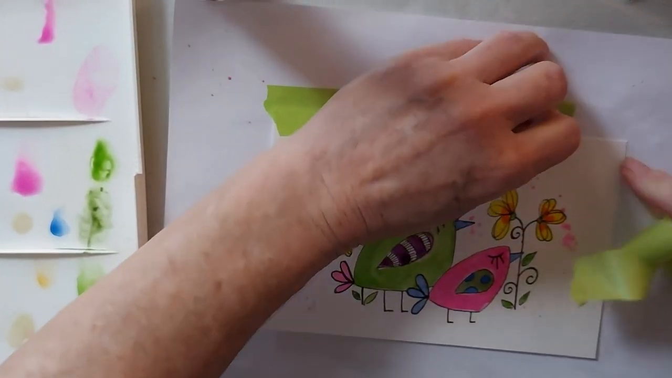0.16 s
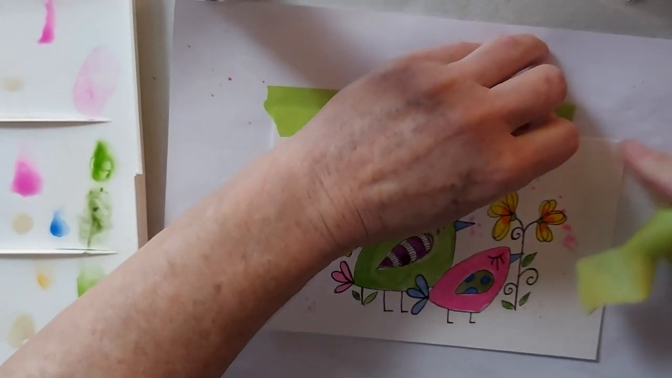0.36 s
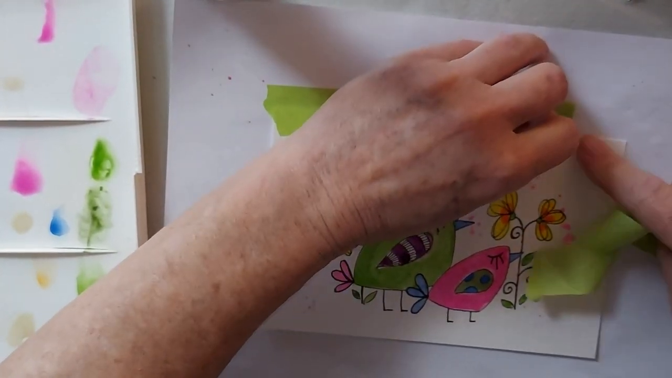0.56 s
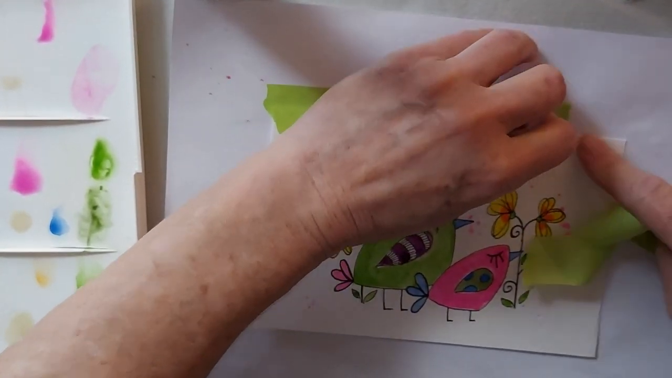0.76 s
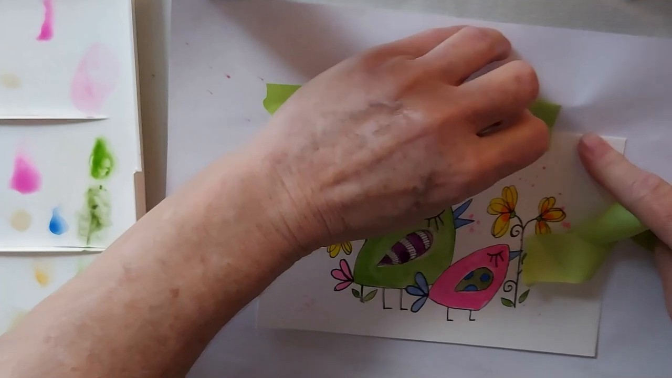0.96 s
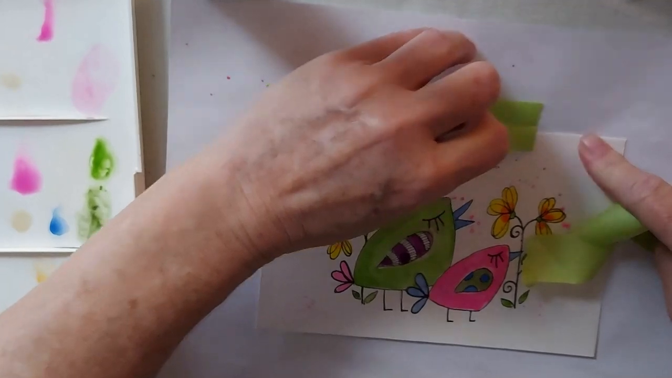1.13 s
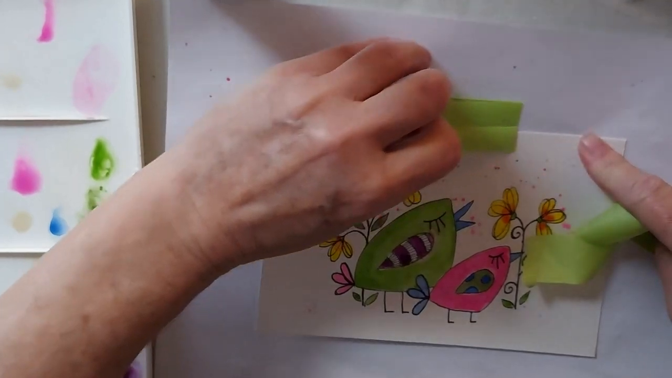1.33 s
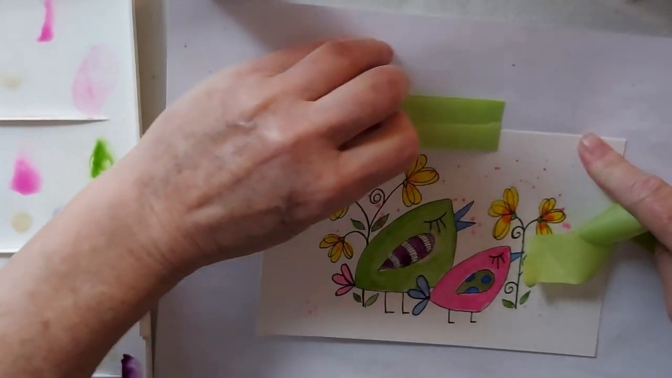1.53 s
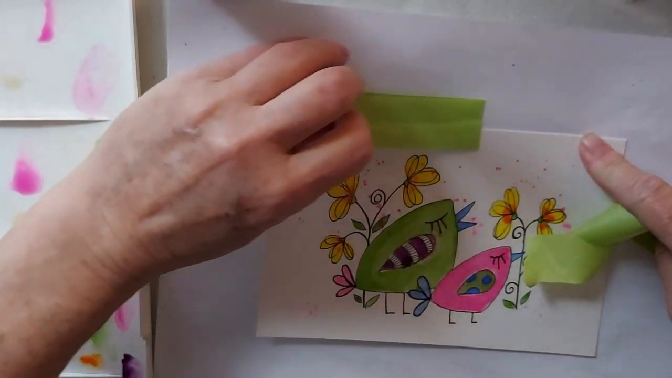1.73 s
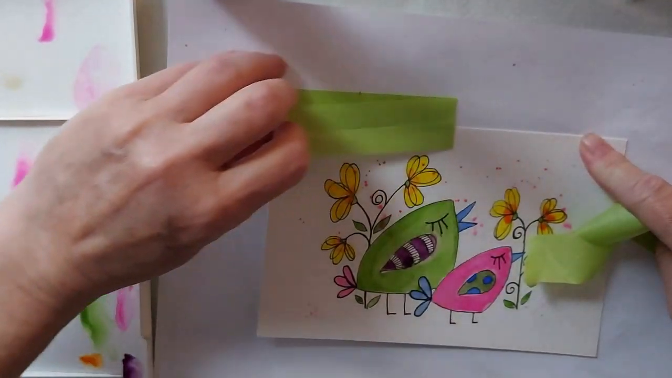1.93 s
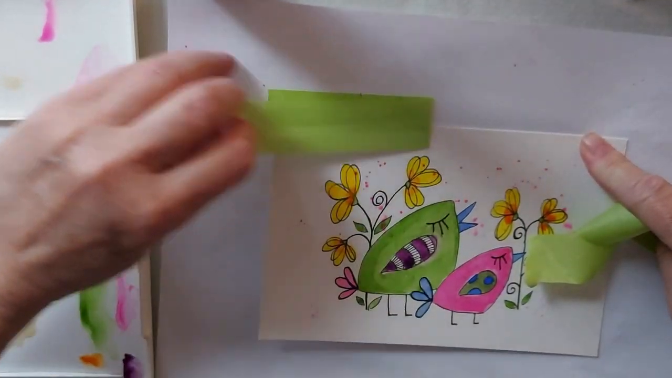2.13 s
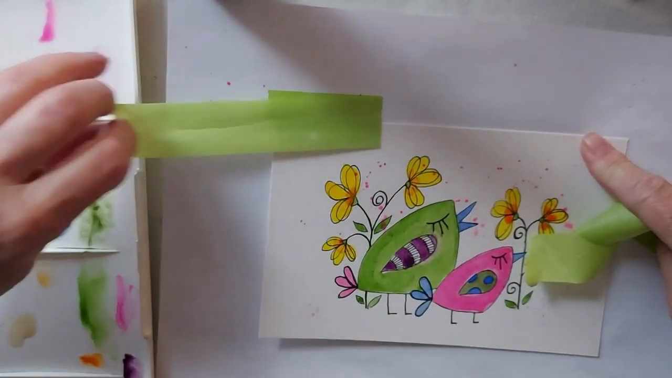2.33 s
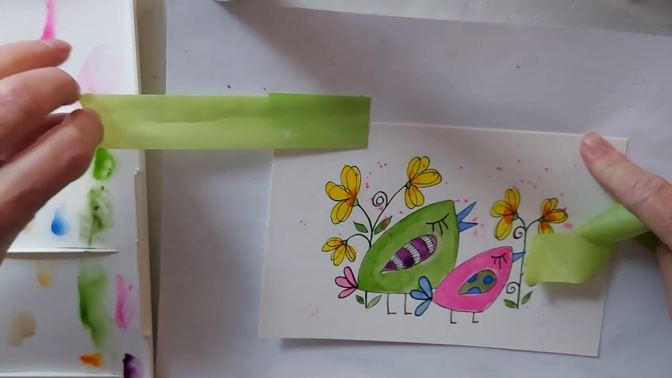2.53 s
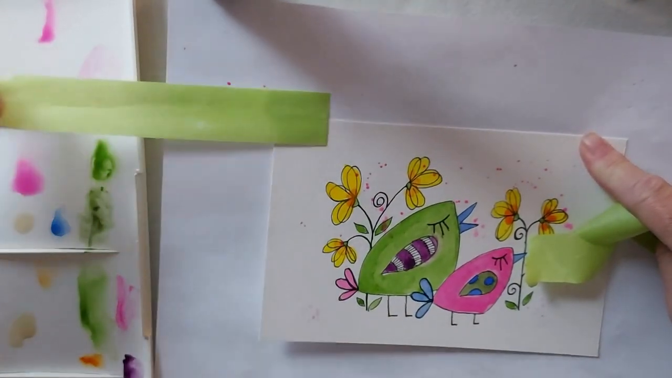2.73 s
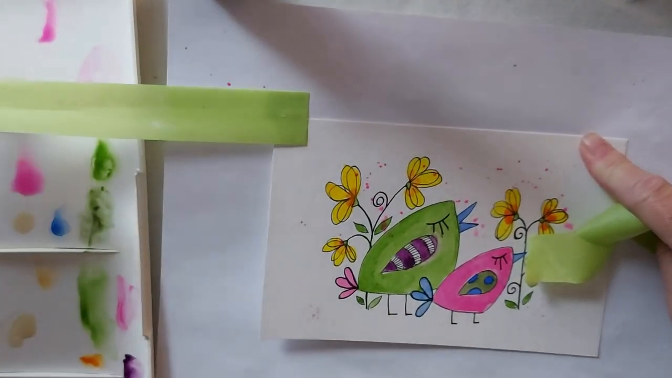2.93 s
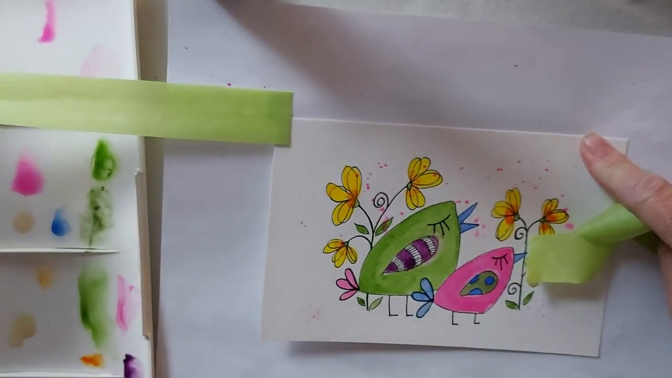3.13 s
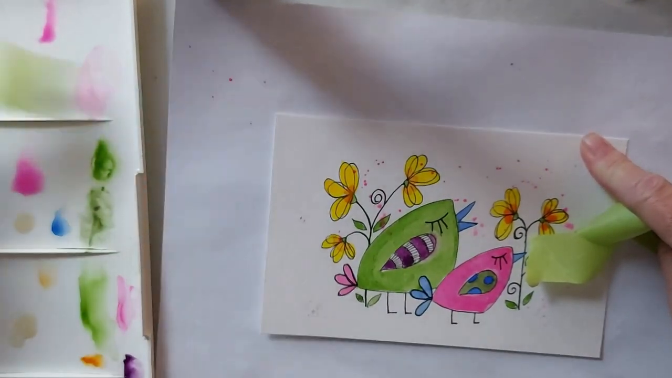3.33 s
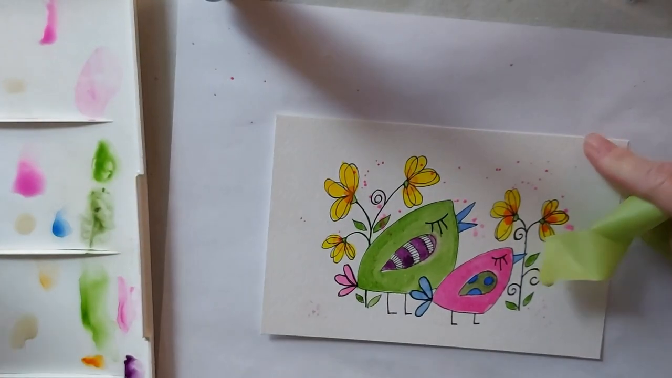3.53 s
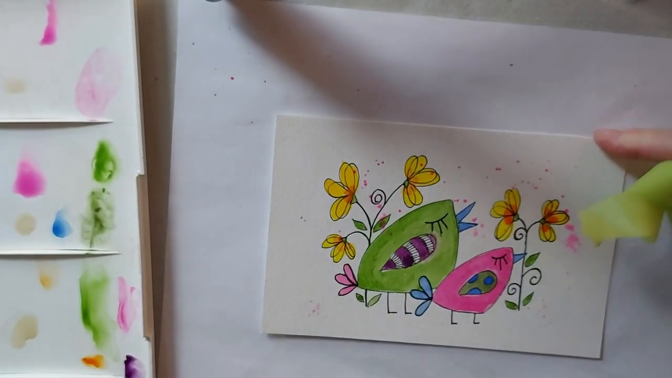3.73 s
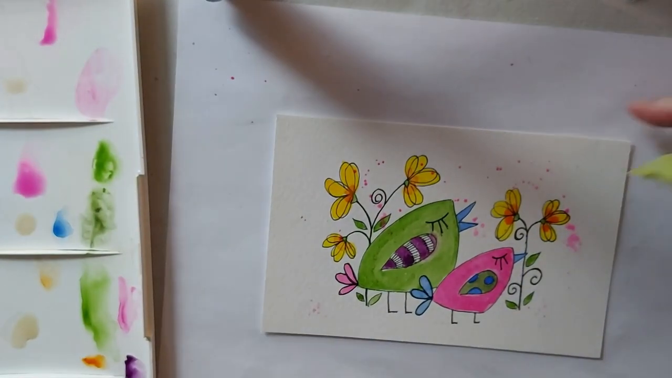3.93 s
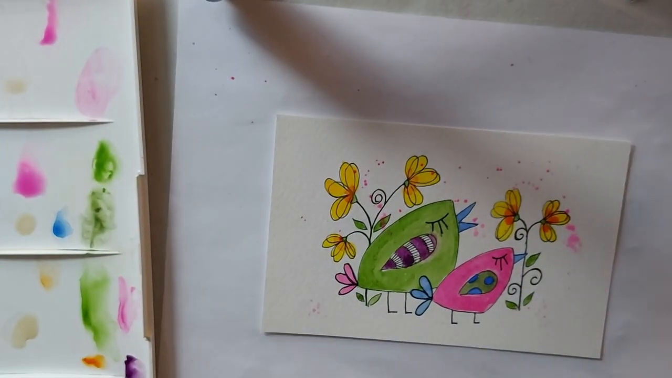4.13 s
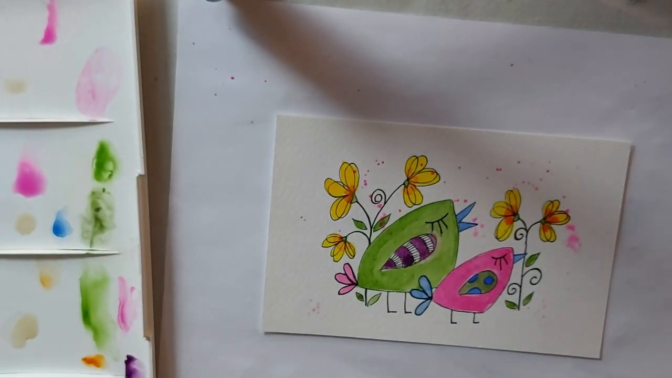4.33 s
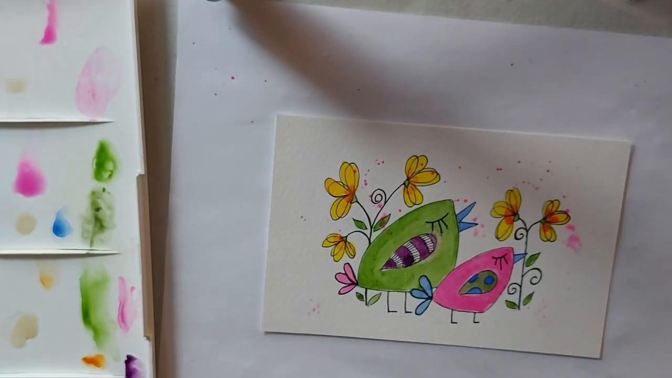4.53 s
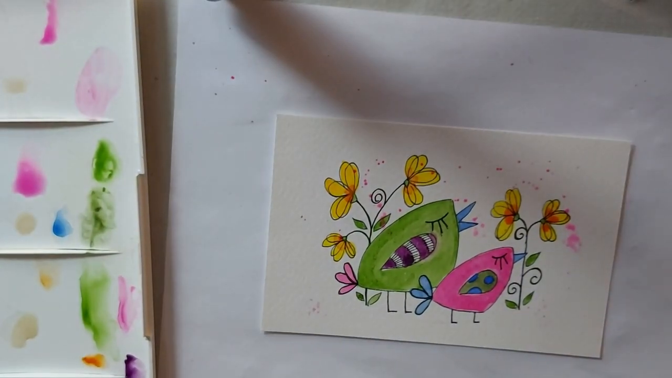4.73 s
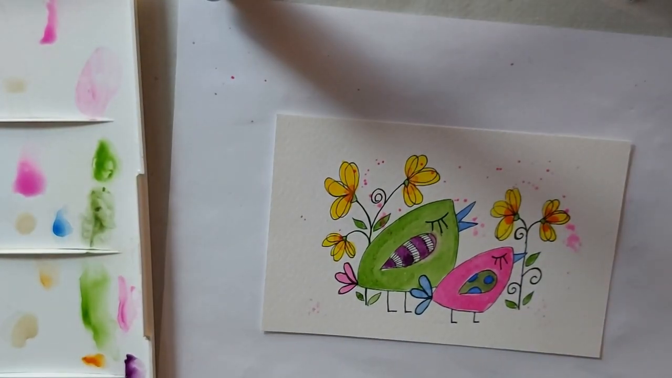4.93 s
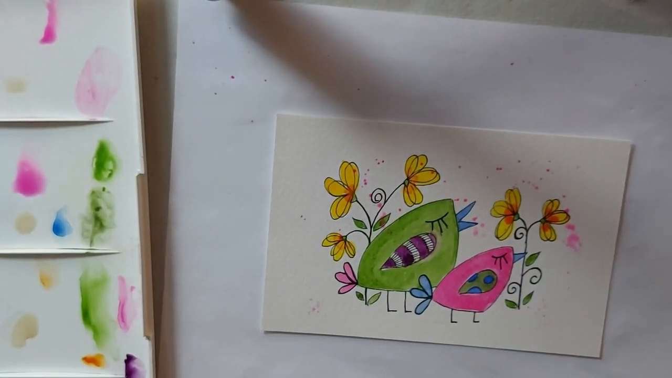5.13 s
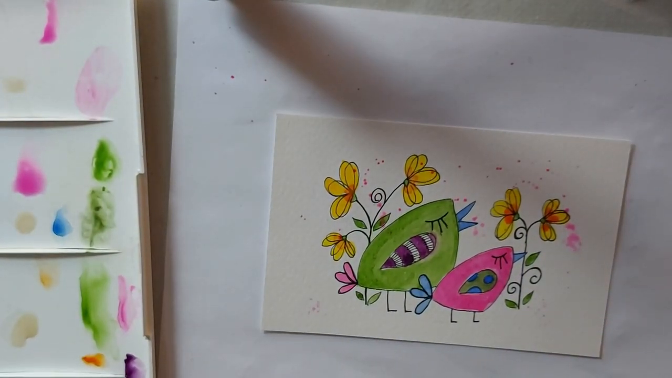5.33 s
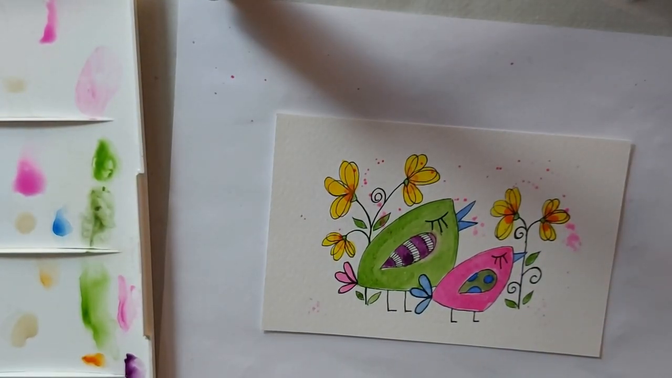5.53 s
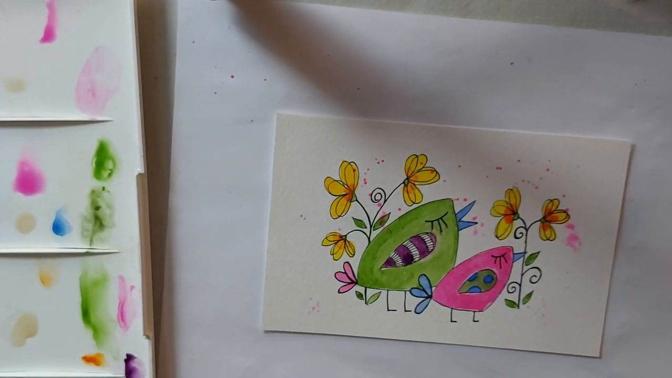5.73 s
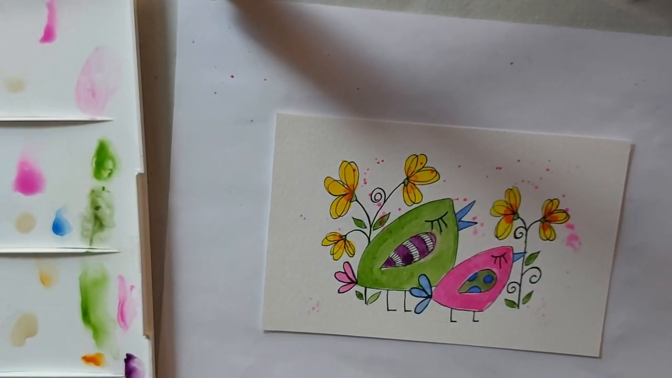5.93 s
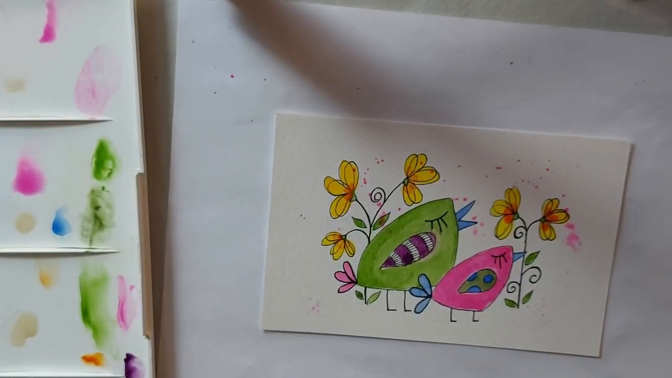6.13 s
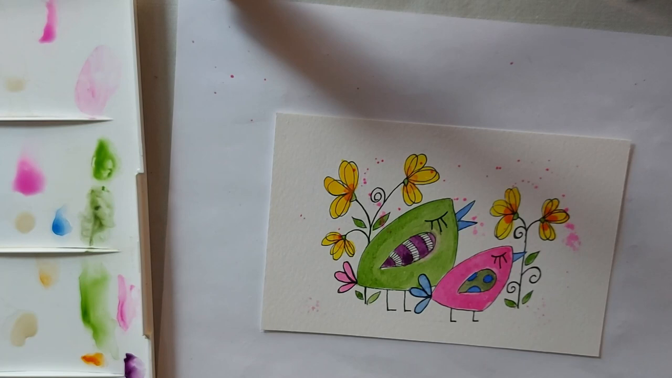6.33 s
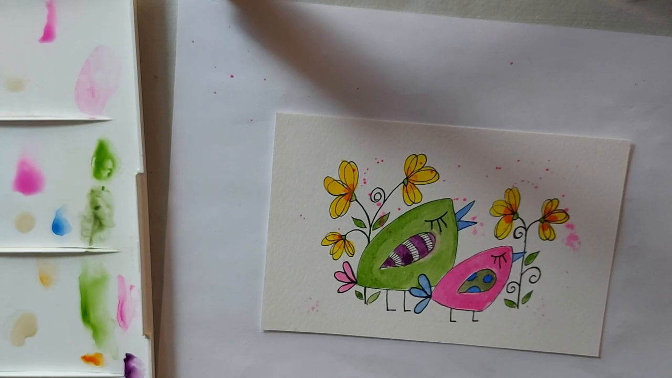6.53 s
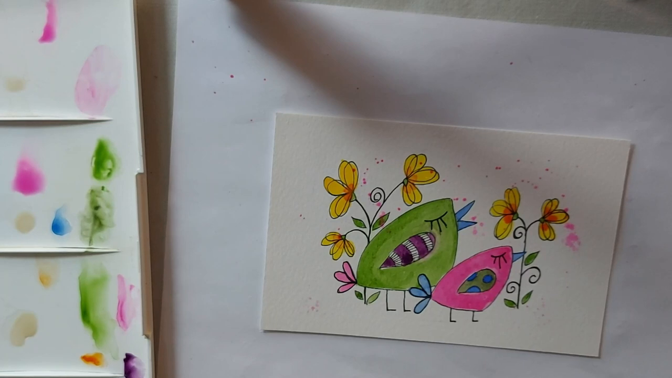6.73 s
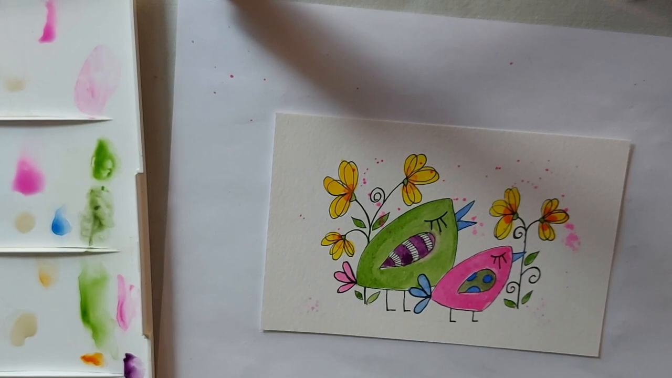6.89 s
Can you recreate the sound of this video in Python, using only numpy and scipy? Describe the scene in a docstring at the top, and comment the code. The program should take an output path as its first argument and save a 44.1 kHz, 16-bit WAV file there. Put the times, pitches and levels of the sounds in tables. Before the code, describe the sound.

Close, raspy tape peeling with two loud ripping tugs and dull table rumble, a short lull, then bright crinkling bursts and a final soft thud.

```python
"""In a small quiet room masking tape is peeled in jerks off a card on a table, then pulled off
the fingers and crumpled in the air, under a phone with two microphone ports; a dull thud ends it.
Dense tiny cracks and lone snaps, as the tape comes loose or buckles, are noise bursts that ring its resonances.
Tugs and hands shake the table top, whose low modes ring under uneven jolts.
The tape is followed by a short dying echo; a steady faint hush lies beneath."""
import sys
import numpy as np
from scipy import signal
from scipy.fft import rfft, irfft
from scipy.io import wavfile
from scipy.ndimage import uniform_filter1d, map_coordinates

SR = 44100
rng = np.random.default_rng(int(sys.argv[2]) if len(sys.argv) > 2 else 0)


def wrap_up_sound(samples):
    """Save the sound to the file named by the first command line argument, as 16-bit audio."""
    columns = np.atleast_2d(samples).T
    # keep every value between -1 and 1, then stretch to whole-number steps
    tamed = np.clip(columns, -1, 1)
    steps = np.round(tamed * 32767).astype(np.int16)
    wavfile.write(sys.argv[1], SR, steps)


N = 306936
T = np.arange(N) / SR  # s

# place of the hands: t/s, left minus right/dB, lag of the left port/ms
HANDS = [(0, 1, -0.048), (.7, -0.5, 0.027), (1.7, -0.5, 0.026), (2.7, 0.2, -0.11), (3.3, 0, -0.085),
         (4.2, 1, -0.08), (4.7, -1.5, 0.02), (5.7, -0.3, .05), (6.3, 0, 0.048), (6.96, 0.5, 0.22)]
# resonance groups of the tape: f/Hz, width/Hz, level within the group/dB, left minus right/dB
TAPE_BODY = [(3060, 2600, 1, 2.5), (4036, 2440, 3.5, -1), (6053, 3250, 5.5, -2), (7650, 2200, -2, 0)]
TAPE_LOW = [(500, 560, -4, 2), (710, 260, -10.5, -2), (1025, 683, 4, 4.5)]
TAPE_RING = [(1458, 510, 0.5, 0.99), (1674, 415, 10, 0.8)]
TAPE_EDGE = [(2014, 380, 7, 1), (2334, 290, 0.5, 0.3), (2603, 800, 4.5, 0)]  # the upper ring
TAPE_TREBLE = [(9140, 1700, -1.5, 4.7), (10690, 4070, 6.5, 3), (13800, 1900, -6.5, 1)]
TAPE = TAPE_BODY, TAPE_LOW, TAPE_RING, TAPE_EDGE, TAPE_TREBLE


def undb(db):
    """Level to amplitude: 20 dB is a factor of ten."""
    return 10 ** (np.asarray(db) / 20)


def unit(x):
    """Normalisation by the root mean square, so that equal signals carry equal power."""
    return x / np.sqrt(np.mean(x ** 2))


def curves(rows):
    """Linear interpolation in time of every column after the first, t/s."""
    s, *columns = np.transpose(rows)
    return [np.interp(T, s, column) for column in columns]


def swells(rows):
    """Incoherent addition: the powers of all swells add, and the loudest leads the other columns."""
    swell_db = 30  # climb within the swell time, and sinking within the fade time
    s, db, swell_s, fade_s, *columns = np.transpose(rows)[:, :, None]
    coarse_t = T[::64]
    late = coarse_t - s
    times_away = np.maximum(-late / swell_s, late / fade_s).clip(0, 8)
    power = undb(db - swell_db * times_away) ** 2
    total = power.sum(axis=0)
    coarse = [np.sqrt(total)] + [(power * column).sum(axis=0) / total for column in columns]
    return [np.interp(T, coarse_t, column) for column in coarse]


def band(x, hz, width_hz):
    """Resonance as a band-pass: two equal resonators in a row, gain 1 at the centre."""
    b, a = signal.iirpeak(hz, hz / width_hz / 1.432, SR)
    return signal.lfilter(b, a, signal.lfilter(b, a, x))


def walk(rate):
    """Random modulation: independent levels, one each 1 / rate s, joined by ramps; rms 1."""
    k = int(SR / rate)
    held = np.repeat(rng.standard_normal(N // k + 1), k)
    return unit(uniform_filter1d(held, k)[:N])


def bursts(s, size, t60_s, rise_s=0.00068):
    """Impulsive excitation: each jump is smoothed by a fast rise and decays exponentially."""
    jumps = np.bincount((s * SR).astype(int), size, N)[:N]
    fall = np.exp(-np.log(1000) / (t60_s * SR))
    rise = np.exp(-1 / (rise_s * SR))
    decaying = signal.lfilter([1], [1, -fall], jumps)
    return signal.lfilter([1 - rise], [1, -rise], decaying)


def hush(alike_hz=400, level_db=-74.5):
    """Spatial coherence of steady room tone and microphone hiss: the ports agree only in the bass."""
    # spectrum of the hush: f/Hz, relative level/dB
    spectrum = np.array([(18, -30.5), (30, 2.5), (115, -7.5), (199, -7.5), (303, -7.5), (1160, -22),
                         (1910, -22), (5310, -23.5), (11700, -13), (16000, -20.5)])
    hz = np.arange(N // 2 + 1) * SR / N + 1
    gain = undb(np.interp(np.log(hz), np.log(spectrum[:, 0]), spectrum[:, 1]))
    mid, side = (rfft(rng.standard_normal(N)) * gain for _ in range(2))
    side = side * np.minimum(hz / alike_hz, 1)
    left, right = irfft(mid + side, N), irfft(mid - side, N)
    return unit(np.array([left, right])) * undb(level_db)


def room(x, t60_s=0.21, level_db=-4.5):
    """Reverberation by table and walls: an exponential tail, different at each port, duller than the source."""
    t = np.arange(int(t60_s * SR)) / SR
    decay = np.exp(-np.log(1000) * t / t60_s) * (t > .002)
    tail = rng.standard_normal((2, len(t))) * decay
    tail = signal.lfilter([1], [1, -.3], tail)
    tail = tail / np.sqrt(np.sum(tail ** 2, axis=1, keepdims=True))
    return x + undb(level_db) * signal.fftconvolve(x, tail, axes=1)[:, :N]


def thud(start_s=6.944, level_db=-42, rise_s=0.0035):
    """Band-filtered noise with a sigmoid onset: a dull low thud sets in as the scene ends."""
    # resonances of the thud: f/Hz, width/Hz, relative level/dB
    thud_modes = [(149, 130, 5), (298, 170, -0.5), (550, 220, -8)]
    noise = rng.standard_normal(N)
    body = unit(sum(undb(db) * unit(band(noise, hz, w)) for hz, w, db in thud_modes))
    onset = 1 / (1 + np.exp(-((T - start_s) / rise_s).clip(-50, 50)))
    return body * undb(level_db) * onset


def table(jolts_per_s=120, spread_db=2.5, upper_db=-8.5):
    """Modal vibration: uneven jolts ring the table top, nearly the same at both ports."""
    # low modes of the table top: f/Hz, width/Hz, level within the group/dB
    main_modes = [(131.2, 13, 0)]
    lowest_modes = [(50, 28, -12), (75, 22, -1)]
    upper_modes = [(226, 28, 0.5), (294.3, 60, 1.5), (367.6, 86, -9.5)]
    # pushes on the table top: peak t/s, main mode level/dB, swell t/s, fade t/s, lowest modes above the main/dB
    pushes = [(0.034, -56, 0.26, 0.063, -15.0), (0.194, -47.5, 0.16, 0.12, -5),
              (0.341, -52, 0.089, 0.098, -1.5), (0.583, -62, 0.366, 0.11, -9),
              (0.868, -55, 0.26, 0.13, -16), (1.075, -48.0, 0.11, 0.22, -11), (1.29, -47, 0.54, 0.485, -4),
              (1.481, -53.5, 0.059, 0.46, 1), (1.755, -44.5, 0.13, 0.22, -8),
              (1.977, -38.5, 0.28, 0.25, -14.5), (2.24, -32, 0.135, 0.23, -15.0),
              (2.739, -37, 0.13, 0.35, -11), (3.287, -36, 0.17, 0.15, -13.0),
              (3.628, -59.5, 0.093, 0.26, -13), (3.824, -61, 0.04, 0.1, -18)]
    # low rumble while arms move over the table: t/s, level of the lowest modes/dB
    rumble_rows = [(3.95, -88), (4.09, -97.5), (4.74, -76.5), (4.78, -90), (5.05, -71), (5.27, -82),
                   (5.63, -67), (5.72, -54), (6.0, -74), (6.09, -64), (6.5, -80), (6.9, -74.5)]

    s, big = rng.random((int(jolts_per_s * N / SR), 2)).T
    size = undb(-spread_db * np.log(1 - big))
    push = unit(bursts(s * N / SR, size, 0.011)) + 1.7  # jolts over a steady floor

    def ring(modes, own):
        """Superposition of modes; own sets the noise that each port has to itself."""
        noise = push * (rng.standard_normal(N) + own * rng.standard_normal((2, N)))
        return unit(sum(undb(db) * unit(band(noise, hz, w)) for hz, w, db in modes))

    gain, lowest_db = swells(pushes)
    lowest = ring(lowest_modes, 0.26)
    top = ring(main_modes, 0.15) + undb(lowest_db) * lowest + undb(upper_db) * ring(upper_modes, 0.53)
    rumble = undb(curves(rumble_rows)[0]) * (lowest + undb(-11.0) * ring(main_modes, 0.61))
    return (top * gain + rumble) * undb(np.array([[-.7], [.7]]))


def ports(alike_hz):
    """Delay and coherence: one wave lagged by the place of the hands, plus each port's own noise."""
    lag = curves(HANDS)[1] * SR / 1000  # samples
    wave, own = rng.standard_normal(N), rng.standard_normal((2, N))
    lagged = map_coordinates(wave, [np.arange(N) - lag], order=3, mode="nearest")
    both = np.array([lagged, wave])

    def noise(hz):
        """Coherence falls with frequency: the ports' own share grows with hz."""
        return (both + hz / alike_hz * own) / np.hypot(1, hz / alike_hz)
    return noise


def pan(x):
    """Level difference between the ports, following the place of the hands."""
    pan_db = curves(HANDS)[0]
    return x * undb(np.array([pan_db, -pan_db]) / 2)


def tape(modes, noise, envelope):
    """Source and filter: noise bursts excite the tape's resonances, each struck anew."""
    out = 0
    for hz, width_hz, db, left_db in modes:
        struck = band(envelope() * noise(hz), hz, width_hz)
        gain = undb(db + np.array([[left_db], [-left_db]]) / 2)
        out = out + struck * gain / np.sqrt(width_hz)  # a wide band gathers more noise power
    return out


def colours():
    """Spectral balance in time: crackle gain, and group levels above the body/dB in the order of TAPE."""
    # jerks of the hand that peel the tape, then crumple it:
    # peak t/s, level/dB, swell t/s, fade t/s, ring above the body/dB, treble above the body/dB
    tugs = [(0.016, -47.5, 0.82, 0.065, -5, -4), (0.102, -46.5, 0.0085, 0.047, -13.0, 8),
            (0.16, -55, 0.21, 0.31, -7, -5), (0.64, -60, 0.46, 0.49, -28, -2),
            (0.853, -53.5, 0.079, 0.17, -7, -3), (1.166, -43.5, 0.62, 0.044, -18, 0.5),
            (1.294, -40, 0.29, 0.19, -10.5, -2.5), (1.466, -49, 0.31, 0.94, -10.5, -1),
            (1.745, -46.5, 0.16, 0.73, -8, 1.5), (1.943, -38.5, 0.19, 0.28, -2.5, 1.5),
            (2.161, -45, 0.026, 0.45, -3.5, 2), (2.241, -26.5, 0.096, 0.18, -2, 7),
            (2.38, -37.5, 0.24, 0.062, -0.5, 3), (2.705, -26.5, 0.083, 0.14, -2.5, 3.5),
            (2.883, -48.5, 0.34, 0.59, 1.0, 4.5), (3.226, -36.5, 0.13, 0.23, -2, -0.5),
            (3.343, -34, 0.083, 0.034, -0.5, -4.5), (3.484, -53, 1.5, 0.071, -10.5, -2),
            (4.103, -66.5, 0.071, 0.159, -13, 15), (4.446, -51.5, 0.069, 0.38, -18, 0),
            (4.524, -49, 0.011, 0.12, -32, -2.5), (4.698, -34, 0.087, 0.13, -20.5, -1.5),
            (4.876, -40.0, 0.049, 1, -9.0, 4), (5.024, -36, 0.088, 0.072, -7.5, -3),
            (5.16, -44.5, 0.61, 0.1, -12.5, -17), (5.339, -37, 0.26, 0.041, -1.5, -1.0),
            (5.459, -21, 0.042, 0.061, -0.5, 1.5), (5.559, -28.5, 0.28, 0.023, -13, -5.5),
            (5.676, -37, 0.041, 0.2, -6.5, -2), (5.807, -26, 0.11, 0.11, -17, -1),
            (5.982, -36, 0.28, 0.033, -8, -5), (6.143, -53.5, 0.0098, 0.906, -17.5, 1.5),
            (6.287, -31.5, 0.088, 0.16, -17, -4), (6.538, -43, 0.048, 0.045, -33, -3.5),
            (6.619, -57, 0.879, 0.12, -13, -9), (6.758, -48.5, 0.026, 0.11, -20, -2),
            (6.928, -61, 0.3, 0.784, -18, -4)]
    # low resonances, fuller while the tape sticks to the card: t/s, level above the body/dB
    low_rows = [(0, -7), (.7, -14.5), (1.0, -8), (2.3, -9), (3.4, -6.5), (4.4, -6), (4.85, -17.5),
                (5.3, -13), (5.9, -20), (6.3, -24), (6.9, -18)]
    gain, ring_db, treble_db = swells(tugs)
    edge_db = -1.5 + .45 * ring_db  # the upper ring follows the ring in part
    return gain, np.array([0 * T, curves(low_rows)[0], ring_db, edge_db, treble_db])


def snaps(noise, t60_s=0.0037, tail_s=0.012, tail_db=-20, colour_db=4.0, edge_db=3.5):
    """Sudden release: the tape snaps loose or buckles in a sharp burst, then flutters out."""
    # lone snaps: t/s, burst level before its rise is smoothed/dB, ring and treble above that level/dB
    snap_rows = [(0.0998, -43, -12, 6), (0.8408, -46, -1.5, -5), (1.1322, -36, -13, -2),
                 (1.1613, -44, -8, 11), (1.2339, -28.5, -19.5, -1), (1.272, -27, -8, -5),
                 (1.291, -27.5, -9, -5), (1.3089, -33.5, -18, -3), (1.4702, -30, -9.5, -0.5),
                 (1.4949, -37.5, -14, -1), (1.726, -33.5, -10.5, 5), (1.8578, -30, -13, 6),
                 (1.9332, -36, -1, -1), (2.158, -26, -6, 2), (2.1899, -22.5, -6, 0),
                 (2.2091, -15, -12.5, 2), (2.221, -26, -10, 4), (2.2368, -12.5, -7.5, 0.5),
                 (2.2583, -18, -14, 1), (2.2913, -17.5, -7.5, 2.5), (2.341, -28, -4.5, 3),
                 (2.3674, -23, -12, 0), (2.3771, -28.5, -10, 4.5), (2.6607, -35, -8, -1),
                 (2.6707, -26, -5.5, 6), (2.6953, -21, -10.5, -1), (2.705, -24, -15, 1),
                 (2.7126, -26.5, -12.5, 8), (2.7382, -25, -10, 0), (2.8764, -29, -7, 3.5),
                 (3.1673, -38, -6, 5), (3.189, -32.5, -13, 0), (3.2193, -30, -11, -1),
                 (3.255, -32.5, -11, 5), (3.2702, -29.5, -4.5, -4), (3.3374, -28, -5, 3.5),
                 (4.0997, -60, -17, 3.5), (4.4159, -56.5, -14, 4), (4.49, -43.5, -11.5, -4),
                 (4.5221, -35, -18, -8), (4.6684, -42, -13, -2), (4.6906, -24, -13, -3),
                 (4.777, -41, -7.5, 5), (4.852, -39.5, -12, -1), (4.8737, -29.5, -19, 9),
                 (4.8812, -24, -15.5, -3), (4.9436, -22, -21, -6), (5.0742, -24, -7.5, -2),
                 (5.0939, -24, -14, -5), (5.1011, -30.5, -9, 2), (5.1265, -23.5, -8, 3.5),
                 (5.1593, -23.5, -15, -9), (5.1742, -21, -23, -8.5), (5.3122, -36, -4.5, -5),
                 (5.3918, -34.5, -7.5, -3), (5.3975, -29, -6, 0), (5.4316, -28, -17, -11),
                 (5.441, -28.5, -15, -13), (5.4594, -39, -17, -6), (5.4869, -18.5, -6, -5),
                 (5.5076, -23.5, -5, -2), (5.5377, -24.5, -10, 3), (5.5653, -31.5, -12, 9),
                 (5.6521, -35.5, -20, 0.5), (5.675, -36, -13, 1), (5.782, -27, -5.5, 0),
                 (5.8114, -35, -4, -3), (5.9165, -38, -2, -5), (6.143, -47.5, -7, -6),
                 (6.2678, -27, -5.5, 1), (6.3087, -26, -7.5, -1), (6.5299, -51, -14, -1),
                 (6.7413, -57.5, -15, 8)]
    s, peak_db, ring_db, treble_db = np.transpose(snap_rows)
    _, low_db, tape_ring_db, tape_edge_db, _ = colours()[1][:, (s * SR).astype(int)]
    balance_db = (tape_ring_db - tape_edge_db) / 2  # the tape as it is held tips lower against upper ring
    group_db = [0, low_db, ring_db + balance_db, ring_db + edge_db - balance_db, treble_db]
    out = 0
    for modes, db in zip(TAPE, group_db):
        def envelope():
            """Two-stage decay: a sharp burst and a weaker, longer tail."""
            size = undb(peak_db + db + colour_db * rng.standard_normal(len(s)))
            return bursts(s, size, t60_s) + undb(tail_db) * bursts(s, size, tail_s)
        out = out + np.sqrt(SR / 2 / len(modes)) * tape(modes, noise, envelope)
    return pan(out)


def crackle(noise, per_s=500, spread_db=7.5, top_db=15, clump_db=1.22, t60_s=0.0083, hiss=0.4):
    """Random impulse train: many small cracks and a few large, their level swaying in clumps."""
    s, big = rng.random((int(per_s * N / SR), 2)).T
    raw_db = -spread_db * np.log(1 - big)
    size = undb(top_db * np.tanh(raw_db / top_db))  # the largest cracks are softly capped
    clump = undb(clump_db * walk(45))

    def envelope():
        """Amplitude modulation: cracks over a floor of hiss, clumped and bent."""
        colour = undb(4 * rng.standard_normal(len(s)))
        bend = undb(2.5 * walk(14))  # the tape bends, so each resonance comes and goes
        return clump * bend * (unit(bursts(s * N / SR, size * colour, t60_s)) + hiss)

    gain, group_db = colours()
    shares = undb(group_db)
    shares = shares / np.sqrt(np.sum(shares ** 2, axis=0))  # the groups' powers sum to 1
    out = sum(share * unit(tape(modes, noise, envelope)) for modes, share in zip(TAPE, shares))
    return pan(out * gain)


def scene():
    """Superposition of tape in the room, table, hush and thud; the thin tape radiates no bass."""
    noise = ports(alike_hz=3020)
    thin = signal.butter(4, 348, "high", fs=SR, output="sos")
    loose_tape = signal.sosfilt(thin, crackle(noise) + snaps(noise))
    return room(loose_tape) + table() + hush() + thud()


def record(dry):
    """Band limit: the phone cuts the top with a steep low-pass at 15.9 kHz."""
    return signal.sosfilt(signal.ellip(10, .2, 70, 15900, fs=SR, output="sos"), dry)


dry = scene()
out = record(dry)
wrap_up_sound(out)
```